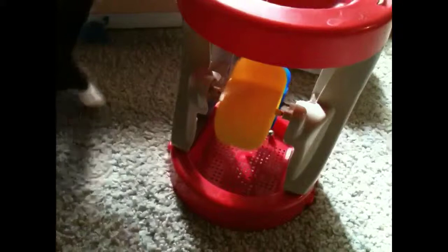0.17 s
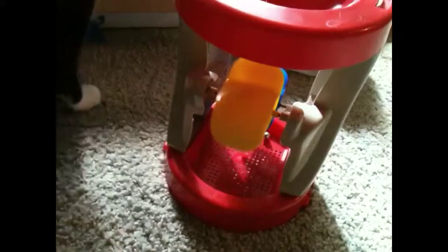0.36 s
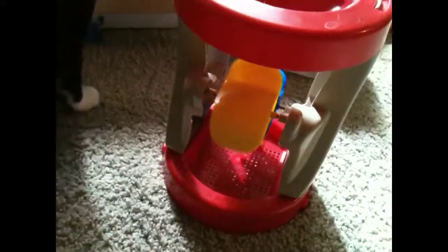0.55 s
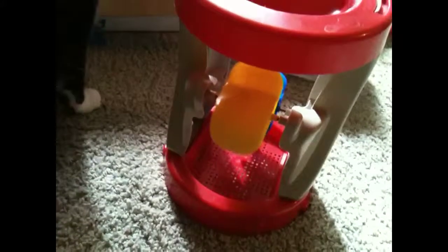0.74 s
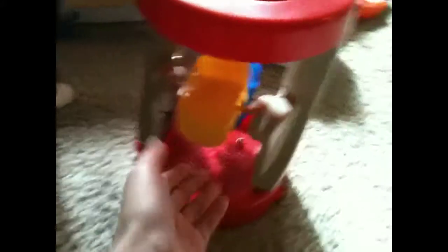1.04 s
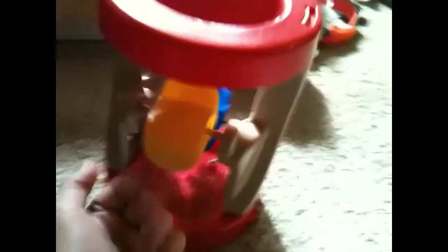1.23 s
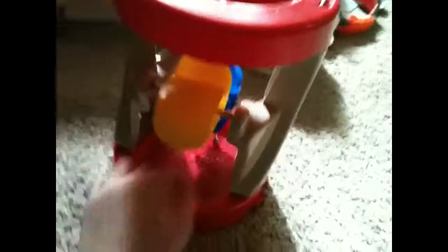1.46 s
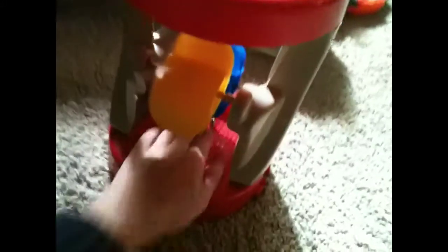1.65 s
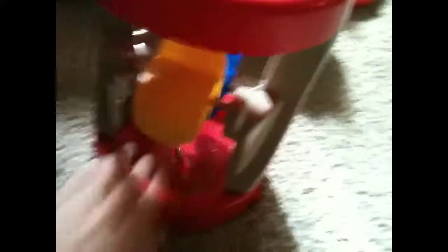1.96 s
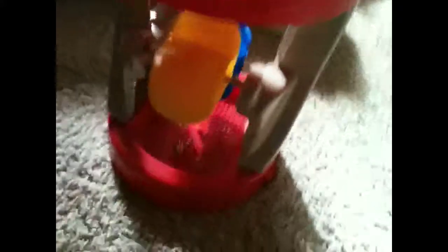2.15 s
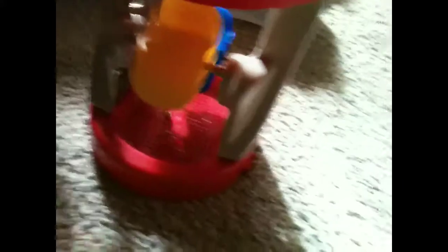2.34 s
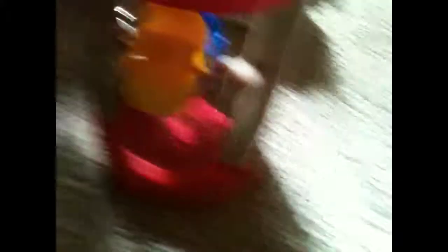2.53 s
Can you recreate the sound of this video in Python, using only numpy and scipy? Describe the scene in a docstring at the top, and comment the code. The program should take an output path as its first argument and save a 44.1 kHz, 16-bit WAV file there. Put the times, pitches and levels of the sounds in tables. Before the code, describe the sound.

Marble clatter in a plastic wheel toy, heard close in a quiet carpeted room; faint tag tinkles and soft paw thumps come first, then a sleeve brush, a click, uneven rolling, a hard clack and tiny settling ticks.

```python
"""Marble in a wheel toy

A glass marble knocks, bounces and rolls in a hollow plastic wheel toy on carpet, close to a phone.
Each blow rings the shell, wall and rim and adds a hard tick; loose pieces clatter on after it.
Between blows, dense small bumps make the same parts chatter as the marble rolls.
Before it a cat pads by, its collar tag tinkling, and a sleeve swishes as filtered noise.
Under it lie quiet room air, a low wavering hum and a thin whine from two steady tones."""
import sys
import numpy as np
from scipy import signal
from scipy.fft import rfft, irfft
from scipy.io import wavfile
from scipy.ndimage import uniform_filter1d

SR = 44100
rng = np.random.default_rng(int(sys.argv[2]) if len(sys.argv) > 2 else 0)


def transcribe(signal):
    """Save signal, clipped to [-1, 1], as a 16-bit WAV file at the path in sys.argv[1]."""
    frames = np.atleast_2d(signal).T
    limited = np.clip(frames, -1, 1)
    pcm = np.round(limited * 32767).astype(np.int16)
    wavfile.write(sys.argv[1], SR, pcm)


N = 119070  # length in samples

# The ways each part of the toy can ring: pitch_hz, level_db [relative dB], t60_s [s to fall by 60 dB]
SHELL_MODES = [(263.5, -2, 0.029), (391.3, 2, 0.036), (454, 5, 0.022), (695, 5.5, 0.0092),
               (1034.5, 5.5, 0.02), (1274, 3.5, 0.0072)]
WALL_MODES = [(1657, -3.5, 0.0085), (2095, -0.5, 0.009), (2343, -4.5, 0.0091), (2643, -3, 0.0069),
              (3635, -10, 0.0063)]
RIM_MODES = [(4040, 2.6, 0.0088), (4710, 0.22, 0.0081), (5380, 1.8, 0.011), (5870, 0, 0.0065),
             (6780, 0.96, 0.0063)]

TOUCH_S = .001  # usual time constant with which a struck part starts to sound


def undb(db):
    """Turn decibels into a plain gain."""
    return 10 ** (np.asarray(db, float) / 20)


def unit(x):
    """Scale a sound to an RMS (average strength) of 1."""
    return x / np.sqrt(np.mean(x ** 2))


def decay(t, t60_s):
    """Fade that falls by 60 dB in t60_s seconds."""
    return np.exp(-np.log(1000) * t / t60_s)


def curve(table, column):
    """Gain that follows a dB column over time, practically silent outside the table."""
    points = np.array(table, float)
    t = np.arange(N) / SR
    return undb(np.interp(t, points[:, 0], points[:, column], left=-140, right=-140))


def coloured(points):
    """Noise whose spectrum follows (Hz, dB) points, with an RMS of 1."""
    points = np.array(points, float)
    hz = np.maximum(np.fft.rfftfreq(N, 1 / SR), 1)
    gain = undb(np.interp(np.log(hz), np.log(points[:, 0]), points[:, 1]))
    return unit(irfft(rfft(rng.standard_normal(N)) * gain, N))


def band(x, hz, width_hz):
    """Two-pole resonance that favours sound near one pitch."""
    return signal.lfilter(*signal.iirpeak(hz, hz / width_hz, fs=SR), x)


def ring(modes, chance, touch_s=TOUCH_S, loose_db=0):
    """One strike makes fading sine waves, varied by chance and pushed again by a fading chatter; peak 1."""
    scatter_db, detune = 2.5, .015  # typical change of level, and of pitch as a fraction
    chatter_db, chatter_t60_s = -21, .022  # chatter starts at this level plus loose_db
    t = np.arange(SR // 10) / SR
    modes = np.array(modes, float)
    count = len(modes)
    signs = (-1) ** np.arange(count)
    gain = undb(modes[:, 1] + scatter_db * chance[:count]) * signs
    hz = modes[:, 0] * (1 + detune * chance[-count:])
    waves = np.sin(2 * np.pi * hz[:, None] * t) * decay(t, modes[:, 2:])
    tone = (gain @ waves) * -np.expm1(-t / touch_s)  # a longer touch starts more softly
    push = undb(chatter_db + loose_db) * chance * decay(t[:len(chance)], chatter_t60_s)
    push[0] = 1  # the strike itself
    x = signal.fftconvolve(tone, push)
    return x / np.abs(x).max()


def add(out, start_s, x):
    """Mix a sound into out at a start time, cutting it at the end."""
    i = int(start_s * SR)
    out[i:i + len(x)] += x[:N - i]


def air():
    """Quiet room air: steady noise shaped by a fixed spectrum."""
    # Spectrum shape of the air: pitch_hz, level_db [relative dB per Hz]
    air_colour = [(25, -24), (65, -26), (182, -10.5), (330, -9.5), (445, -8), (524, -19), (600, -16),
                  (787, -16.5), (1030, -16), (1250, -17), (1590, -18), (2400, -20.5), (2820, -24),
                  (3060, -21.5), (8830, -22), (12200, -23.5), (14800, -30.5), (16500, -53)]
    return undb(-69.5) * coloured(air_colour)


def hum():
    """Low hum: noise through two resonances at one pitch, its level wavering."""
    # Level of the hum over time: time_s, level_db [RMS]
    hum_level = [(0.0, -63), (0.28, -80.5), (0.44, -66), (0.53, -80.5), (0.76, -67), (0.86, -89),
                 (1.2, -67.5), (1.22, -85), (1.29, -61.5), (1.39, -69.5), (1.51, -64.5), (2.14, -62),
                 (2.16, -60), (2.38, -63.5), (2.41, -73.5), (2.62, -67.5), (2.7, -80)]
    hum_hz, width_hz = 184.4, 46
    narrow = band(rng.standard_normal(N), hum_hz, width_hz)
    return curve(hum_level, 1) * unit(band(narrow, hum_hz, 2 * width_hz))


def whine():
    """Thin whine: two steady sine waves so close in pitch that they beat."""
    # Pitches of the two tones: pitch_hz
    whine_pitches = (14970, 15030)
    t = np.arange(N) / SR
    peak = np.sqrt(2) * undb(-80.5)  # RMS dB of each tone, turned into a peak
    return peak * sum(np.sin(2 * np.pi * hz * t) for hz in whine_pitches)


def tag():
    """A small metal tag tinkles as the cat steps away: soft-starting, rattly strikes ring its modes."""
    # Strikes of the tag: start_s, level_db [peak]
    tag_strikes = [(0.031, -50), (0.0957, -56), (0.18, -55.5), (0.2039, -55), (0.2144, -64),
                   (0.2224, -57.5), (0.2684, -58), (0.2862, -53.5), (0.3667, -54.5), (0.4663, -64),
                   (0.5247, -65)]
    # Ways the tag can ring: pitch_hz, level_db [relative dB], t60_s [s to fall by 60 dB]
    tag_modes = [(4240, 0, 0.0052), (4822, -7, 0.034), (5090, -14.5, 0.056), (5450, 0, .008),
                 (6220, -1, 0.0054), (9900, -12, 0.015)]
    touch_s, rattle_db = .003, 12
    out = np.zeros(N)
    for start_s, level_db in tag_strikes:
        chance = .5 * rng.standard_normal(600)
        add(out, start_s, undb(level_db) * ring(tag_modes, chance, touch_s, rattle_db))
    return out


def paws():
    """The cat's paws jog the toy through the carpet: soft, scuffed thumps ring its parts."""
    # Paw steps: start_s, shell_db [peak], wall_db [peak]
    paw_steps = [(0.042, -55, -58.5), (0.0578, -53, -56.5), (0.1646, -56, -64.5), (0.4131, -55, -64),
                 (0.4291, -53, -57), (0.7174, -51, -59), (0.7335, -50, -54), (1.0917, -59, -69),
                 (1.1077, -56.5, -67)]
    touch_s, scuff_db = .004, 8
    rim_db = -4.5  # rim level relative to the wall
    out = np.zeros(N)
    for start_s, shell_db, wall_db in paw_steps:
        chance = rng.standard_normal((3, 1000))
        shell = ring(SHELL_MODES, chance[0], touch_s, scuff_db)
        wall = ring(WALL_MODES, chance[1], touch_s / 2, scuff_db)
        rim = ring(RIM_MODES[:2], chance[2])
        add(out, start_s, undb(shell_db) * shell + undb(wall_db) * (wall + undb(rim_db) * rim))
    return out


def sleeve():
    """Cloth brushes past: smooth hiss that swells and fades."""
    # Swishes: peak_s, level_db [RMS at the peak], rise_db_per_s, fall_db_per_s
    swishes = [(0.8, -62, 330, 1500), (0.963, -59.5, 106, 73)]
    # Spectrum shape of the cloth: pitch_hz, level_db [relative dB per Hz]
    cloth_colour = [(710, -43), (1290, -23), (2540, -8.5), (3380, -10), (6860, -4.5), (15000, -17)]
    t = np.arange(N) / SR
    swell = np.zeros(N)
    for peak_s, level_db, rise, fall in swishes:
        drop_db = np.where(t < peak_s, rise * (peak_s - t), fall * (t - peak_s))
        swell += undb(level_db - drop_db)
    return swell * coloured(cloth_colour)


def bumps():
    """Small pushes at random moments, either way, with a few much stronger than the rest."""
    per_s, scatter_db = 800, 4
    hits = rng.random(N) < per_s / SR
    direction = rng.choice([-1, 1], N)
    return hits * direction * undb(scatter_db * np.minimum(rng.exponential(size=N), 4))


def lurch():
    """Uneven strength of the roll: random levels, smoothed where they step."""
    per_s, lurch_db = 45, 4
    hold = SR // per_s
    steps = np.repeat(rng.standard_normal(N // hold + 1), hold)
    return unit(undb(lurch_db * uniform_filter1d(steps, hold // 2)[:N]))


def roll():
    """Rolling marble: dense uneven bumps ring the toy's parts, and gritty noise rides along with the rim."""
    # Rolling chatter over time, before lurching: time_s, shell_db [RMS], wall_db [RMS], rim_db [RMS]
    roll_levels = [(1.25, -66, -107, -99), (1.308, -60, -65.5, -67), (1.436, -59, -66.5, -63.5),
                   (1.802, -65.5, -74, -65), (1.862, -55.5, -69, -65), (1.958, -63, -67, -56.5),
                   (2.046, -63.5, -65, -62), (2.126, -65.5, -59, -56), (2.244, -60, -80, -63.5),
                   (2.304, -72.5, -77.5, -69.5), (2.448, -70, -73.5, -68.5), (2.58, -73.5, -74, -67),
                   (2.68, -86, -101, -85)]
    grit_hz, grit_width_hz, grit_db = 6200, 7700, 3.5  # grit level is relative to the rim
    shared = bumps()

    def part(modes):
        """Bumps partly shared by all parts, ringing this one."""
        return unit(signal.fftconvolve(.5 * shared + bumps(), ring(modes, np.zeros(10)))[:N])

    rough = unit(shared) + rng.standard_normal(N)
    grit = unit(band(band(rough, grit_hz, grit_width_hz), grit_hz, grit_width_hz))
    shell = curve(roll_levels, 1) * part(SHELL_MODES)
    wall = curve(roll_levels, 2) * part(WALL_MODES)
    rim = curve(roll_levels, 3) * unit(part(RIM_MODES) + undb(grit_db) * grit)
    return lurch() * (shell + wall + rim)


def tick(noise):
    """Glass on plastic: a click, its echo across the wheel and a short hiss, all in one high band."""
    tail_db, tail_t60_s = -10, .012
    echo_s, echo_db = .00105, -4
    tick_hz, width_hz = 7370, 4400
    low_hz, top_hz = 3600, 12160
    x = undb(tail_db) * noise * decay(np.arange(len(noise)) / SR, tail_t60_s)
    x[0] = 1  # the click
    x[int(echo_s * SR)] += undb(echo_db)
    x = band(x, tick_hz, width_hz)
    x = signal.lfilter(*signal.butter(3, [low_hz, top_hz], "band", fs=SR), x)
    return x / np.abs(x).max()


def clatter(shake):
    """Loose pieces clatter: spiky noise in a middle band, as strong as the shaking."""
    low_hz, top_hz = 770, 4170
    loose = rng.standard_normal(N) * rng.exponential(size=N)
    return shake * unit(signal.lfilter(*signal.butter(2, [low_hz, top_hz], "band", fs=SR), loose))


def blows():
    """Every blow rings the three parts and adds a tick; loose pieces clatter on after it."""
    # Blows: start_s, shell_db [peak], wall_db [peak], rim_db [peak], rim_pitch_hz, tick_db [peak]
    blow_list = [(1.2592, -38.5, -24, -21, 6250, -23), (1.2662, -45, -46.5, -37, 4600, -63),
                 (1.2873, -45, -49, -81, 5600, -35), (1.291, -36, -39, -27, 5730, -29),
                 (1.2992, -51, -42, -33, 3970.0, -31.5), (1.3052, -45.5, -45, -41, 6200, -38),
                 (1.3299, -45, -41, -42, 4370, -49), (1.3725, -48.5, -55, -45, 4580, -66.0),
                 (1.4016, -43.5, -41, -45, 4340, -62), (1.4391, -54.5, -59, -32, 6600, -37.5),
                 (1.4705, -58, -67, -45, 4270, -68), (1.4762, -48.5, -44.5, -54, 4360, -65),
                 (1.5082, -42.5, -44, -46, 4680, -61), (1.5187, -41.5, -50, -48, 5700, -50),
                 (1.5372, -46.5, -38.5, -37.5, 4200, -65.0), (1.5692, -41.5, -39.5, -40.5, 4700, -49),
                 (1.6148, -51, -59, -32, 5000, -42), (1.6475, -49, -53, -45, 4340.0, -51),
                 (1.657, -50.5, -47.5, -56, 4000, -67), (1.6732, -45.5, -40, -48.5, 3860.0, -66.0),
                 (1.687, -50.5, -49, -68, 4200, -72), (1.695, -55, -67, -70, 4200, -70),
                 (1.7056, -45.5, -51, -61, 4220.0, -71), (1.7174, -47, -45.5, -62, 3990.0, -65.0),
                 (1.7248, -71, -70, -46.5, 4650, -67.0), (1.7544, -45, -38.5, -47, 4230.0, -61),
                 (1.771, -57, -61, -43, 5200, -65), (1.799, -60, -55, -56, 5300, -61),
                 (1.8069, -48.5, -70, -35.5, 4900, -43.5), (1.818, -43, -43.5, -44, 4460, -51),
                 (1.8297, -45.5, -46, -44, 4370, -55), (1.8418, -74, -54, -42.5, 4970, -50),
                 (1.8568, -44, -38.5, -37.5, 4060, -62.0), (1.867, -51, -40.5, -58, 4140.0, -60),
                 (1.8871, -52, -59, -39, 5260, -56), (1.9054, -48, -67, -46, 5270, -60),
                 (1.9395, -45, -46.5, -47, 4790.0, -62), (1.9536, -37.5, -41, -40.5, 4700, -54),
                 (1.9646, -50, -46, -54, 5540.0, -47), (1.9817, -46, -47.5, -40.5, 5750, -46),
                 (1.9907, -47, -60, -39, 5500, -54), (2.0018, -46.5, -51.5, -44, 4960, -47),
                 (2.0174, -44, -49, -35.5, 6000, -37.5), (2.0414, -52, -45.5, -46, 4940, -50),
                 (2.05, -49, -55, -52, 5730.0, -42), (2.1182, -71, -41.5, -47, 5530.0, -41),
                 (2.1326, -57, -56, -43, 6000, -36), (2.158, -33.5, -16, -16.5, 5800, -12.5),
                 (2.173, -40, -60, -49, 5400, -46), (2.2014, -45.5, -44, -30.5, 6200, -26.5),
                 (2.2279, -57, -61, -40, 4970, -41), (2.2292, -49, -41.5, -40, 5700.0, -32),
                 (2.248, -66, -52, -43, 6140, -36.5), (2.2646, -58, -59, -42, 5070, -57),
                 (2.307, -49.5, -48.5, -49, 5830, -51), (2.3391, -56, -55, -52.5, 4580, -73),
                 (2.4372, -67, -58, -52, 5060, -49), (2.467, -60, -55, -60.5, 4770, -66),
                 (2.5162, -61, -60, -54, 5040, -63), (2.5439, -59.5, -53, -45.5, 5150, -46.5),
                 (2.5574, -64, -58, -52, 5360, -51), (2.5682, -64, -51, -47, 5170, -43.5),
                 (2.58, -73, -64, -58, 5070.0, -50), (2.5925, -64, -60, -61, 4700.0, -54),
                 (2.6133, -56.5, -57, -57, 4750.0, -58)]
    shell_touch_s = .0025
    rim_focus_db = 15  # rim modes weaken by this much per octave away from the rim pitch
    clatter_db, clatter_t60_s = -21, .17  # level relative to the wall knock
    out, shake = np.zeros(N), np.zeros(N)
    fade = decay(np.arange(SR // 4) / SR, clatter_t60_s)
    for start_s, shell_db, wall_db, rim_db, rim_hz, tick_db in blow_list:
        chance = rng.standard_normal((4, 1000))
        focused = [(hz, db - rim_focus_db * abs(np.log2(hz / rim_hz)), t60_s)
                   for hz, db, t60_s in RIM_MODES]
        add(out, start_s, undb(shell_db) * ring(SHELL_MODES, chance[0], shell_touch_s))
        add(out, start_s, undb(wall_db) * ring(WALL_MODES, chance[1]))
        add(out, start_s, undb(rim_db) * ring(focused, chance[2]))
        add(out, start_s, undb(tick_db) * tick(chance[3]))
        add(shake, start_s, undb(wall_db + clatter_db) * fade)
    return out + clatter(shake)


def room(close):
    """Room echo: the close sound is smeared by a fading, dulled noise tail."""
    room_db, t60_s, top_hz = -17.5, .19, 4100
    t = np.arange(SR // 2) / SR
    tail = rng.standard_normal(len(t)) * decay(t, t60_s) * (t > .004)  # short gap before the echo
    tail = signal.lfilter(*signal.butter(1, top_hz, fs=SR), tail)
    tail = tail / np.sqrt(np.sum(tail ** 2))
    return undb(room_db) * signal.fftconvolve(close, tail)[:N]


def scene():
    """Thin the toy and tag at the bottom, give them a room, then add the sleeve and background."""
    mic_low_hz = 130
    low_cut = signal.butter(3, mic_low_hz, "high", fs=SR, output="sos")
    close = signal.sosfilt(low_cut, tag() + paws() + roll() + blows())
    background = air() + hum() + whine()
    return (close + room(close) + sleeve() + background)[None]


def record(dry):
    """The phone cuts the top: a steep filter removes the highest treble."""
    top_hz = 16450
    return signal.sosfilt(signal.ellip(10, .2, 70, top_hz, fs=SR, output="sos"), dry)


dry = scene()
out = record(dry)
transcribe(out)
```